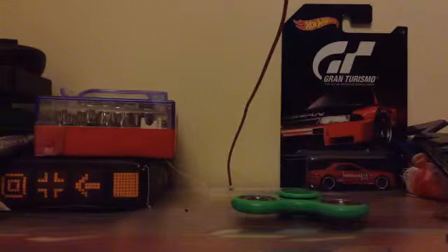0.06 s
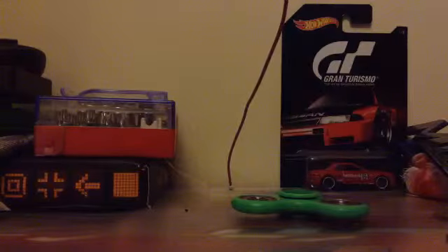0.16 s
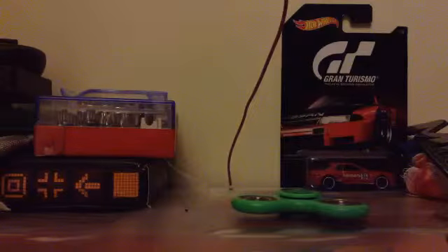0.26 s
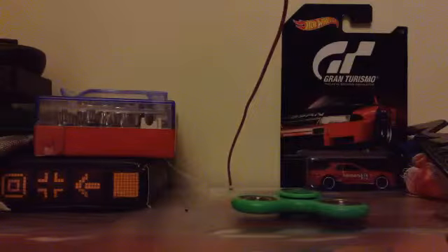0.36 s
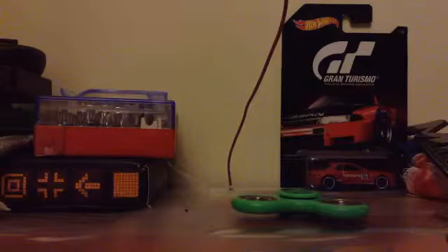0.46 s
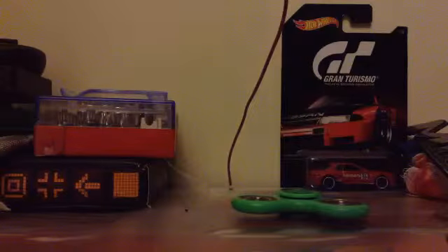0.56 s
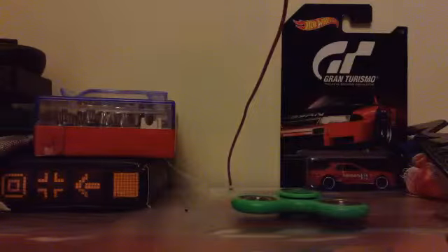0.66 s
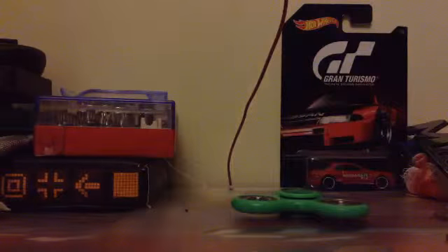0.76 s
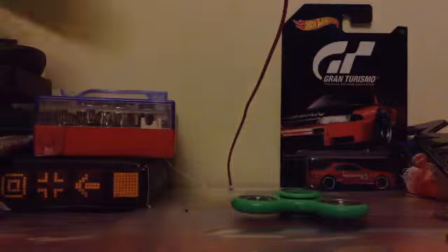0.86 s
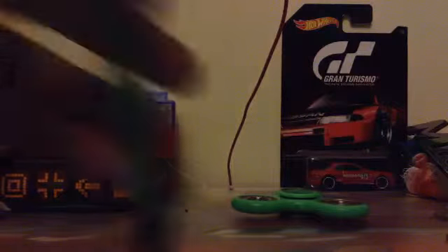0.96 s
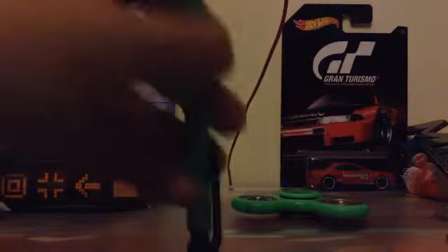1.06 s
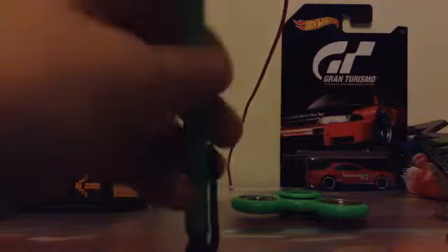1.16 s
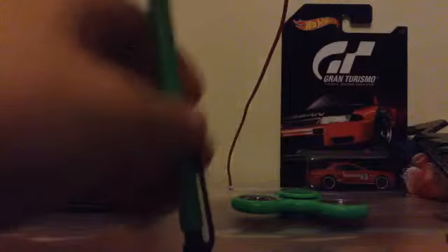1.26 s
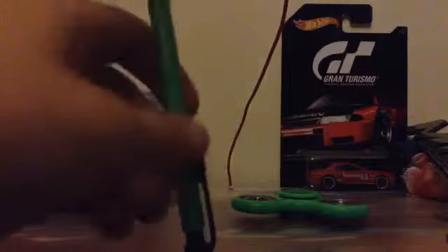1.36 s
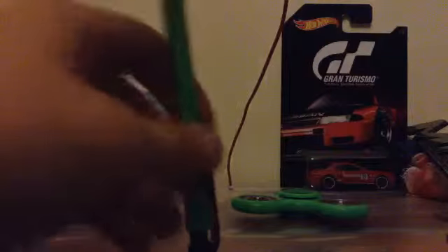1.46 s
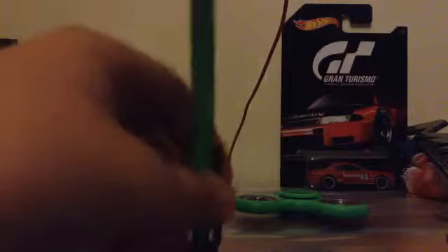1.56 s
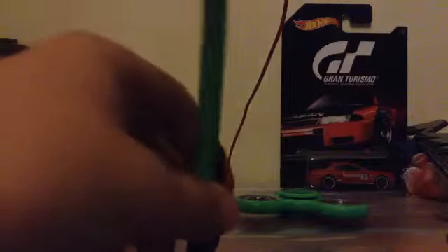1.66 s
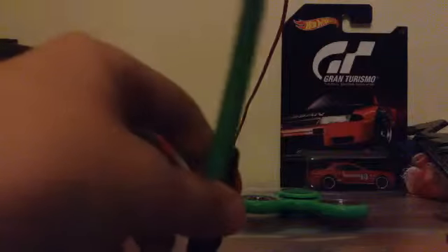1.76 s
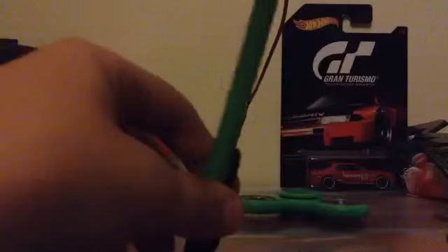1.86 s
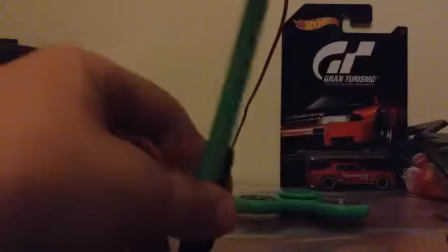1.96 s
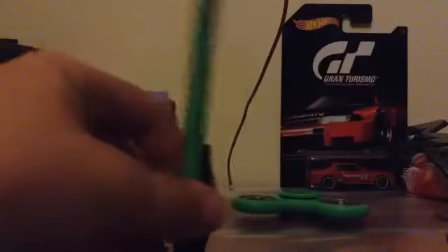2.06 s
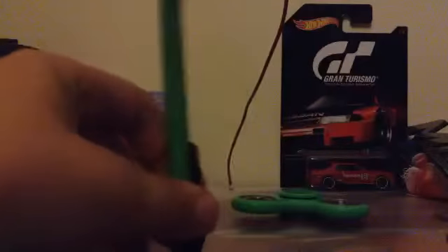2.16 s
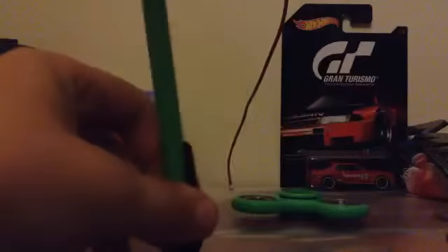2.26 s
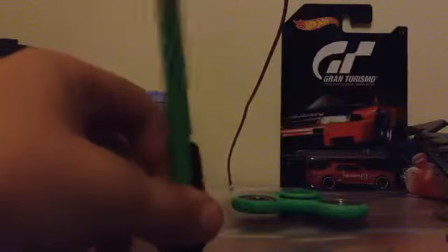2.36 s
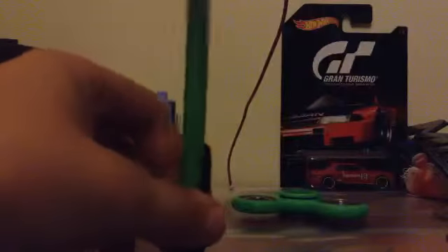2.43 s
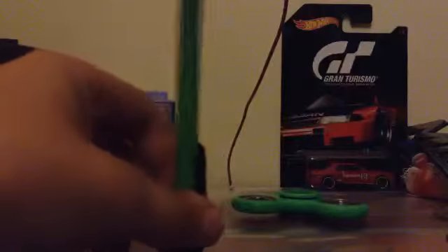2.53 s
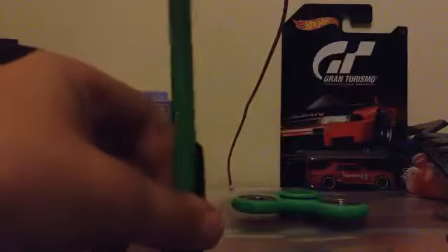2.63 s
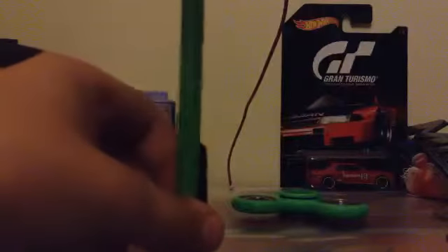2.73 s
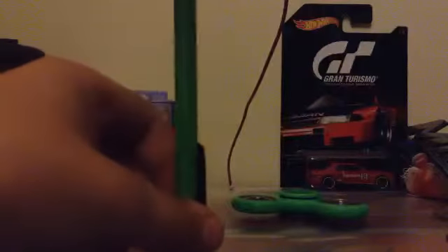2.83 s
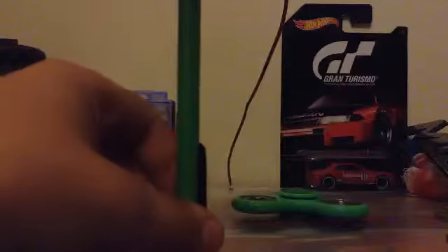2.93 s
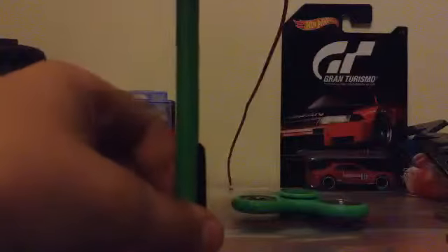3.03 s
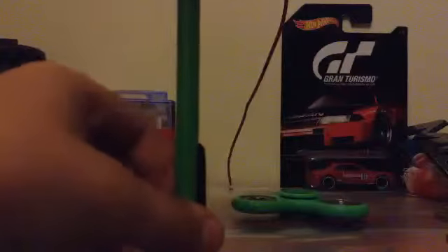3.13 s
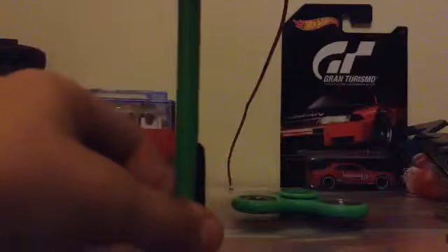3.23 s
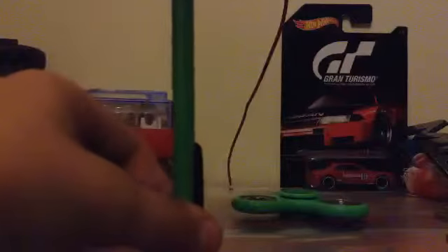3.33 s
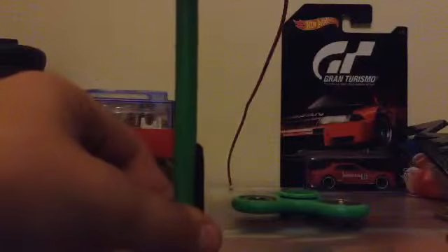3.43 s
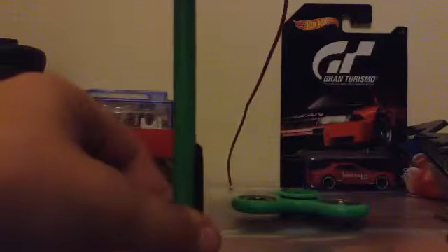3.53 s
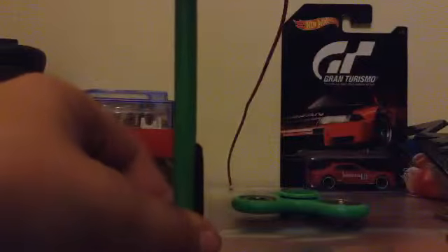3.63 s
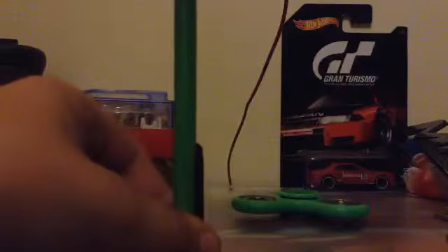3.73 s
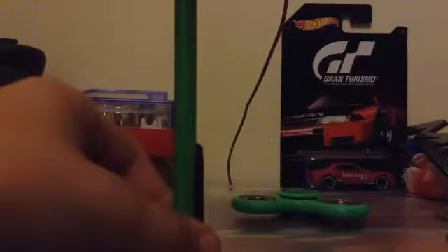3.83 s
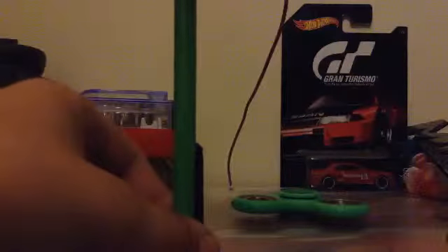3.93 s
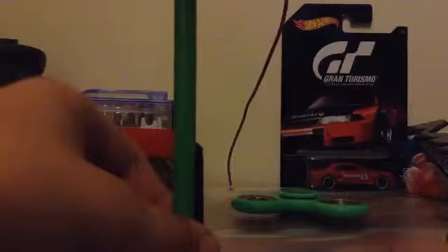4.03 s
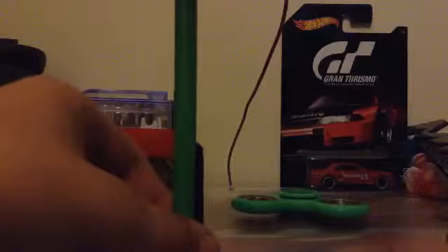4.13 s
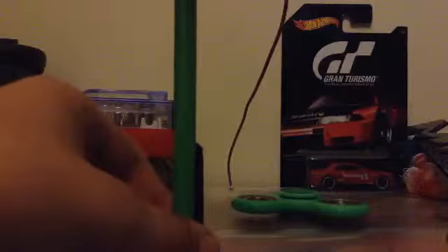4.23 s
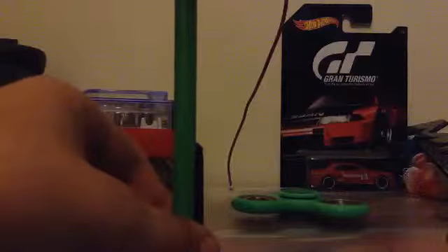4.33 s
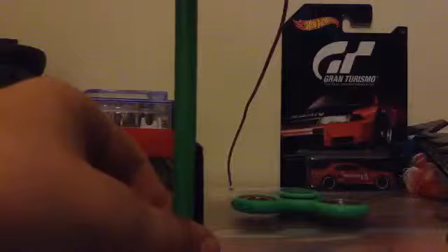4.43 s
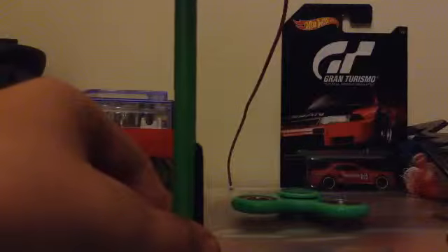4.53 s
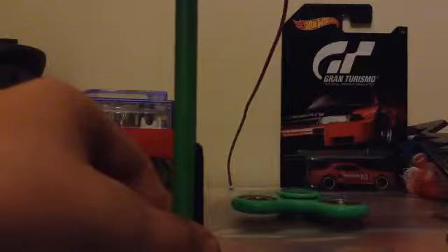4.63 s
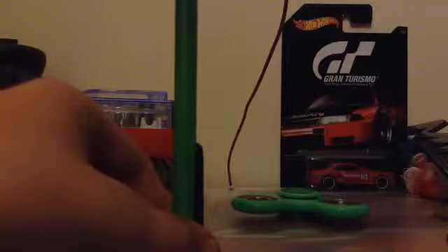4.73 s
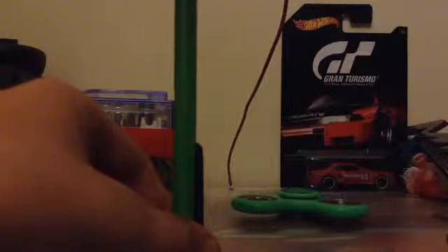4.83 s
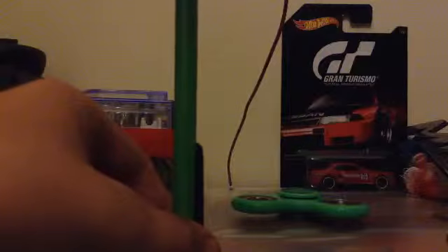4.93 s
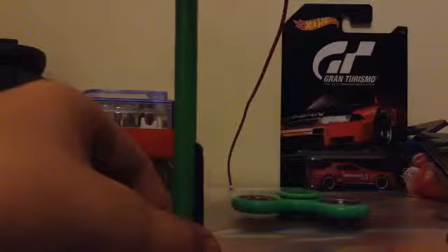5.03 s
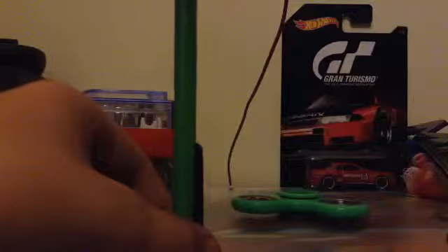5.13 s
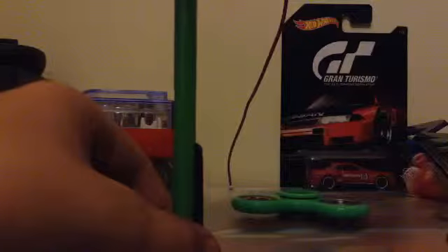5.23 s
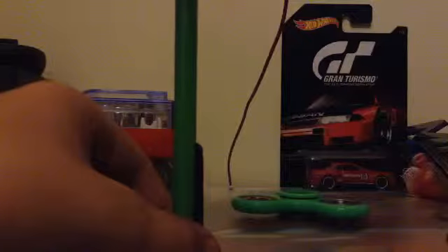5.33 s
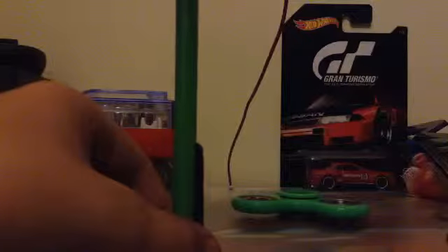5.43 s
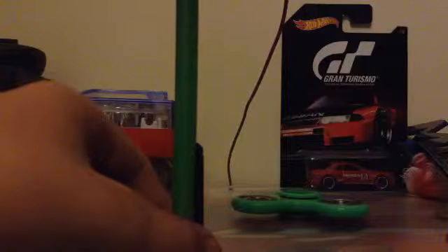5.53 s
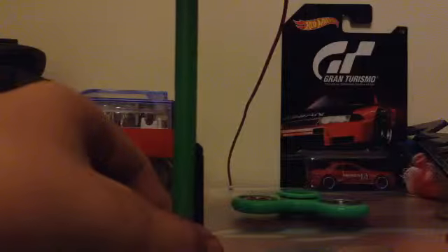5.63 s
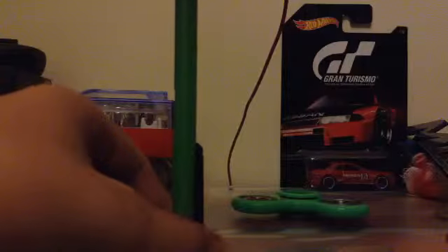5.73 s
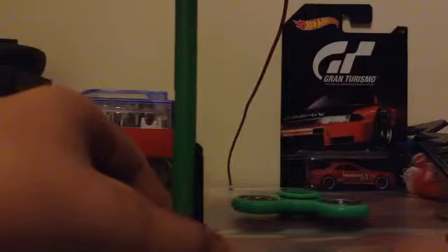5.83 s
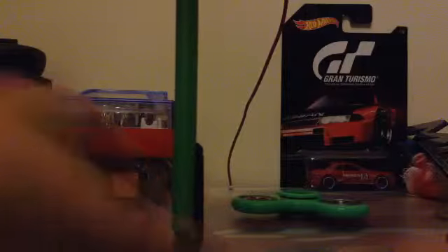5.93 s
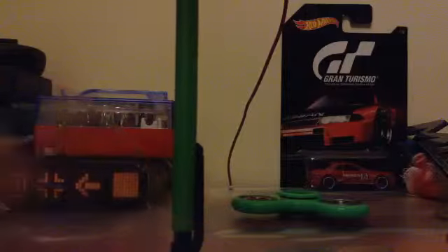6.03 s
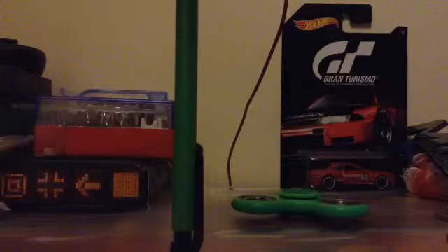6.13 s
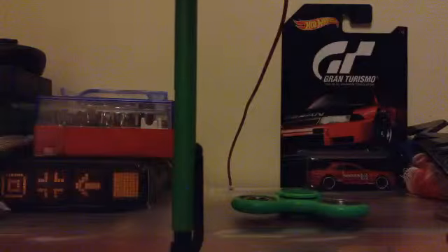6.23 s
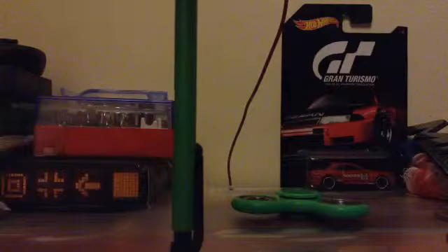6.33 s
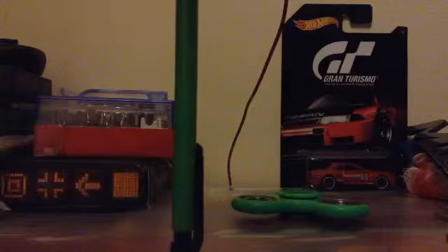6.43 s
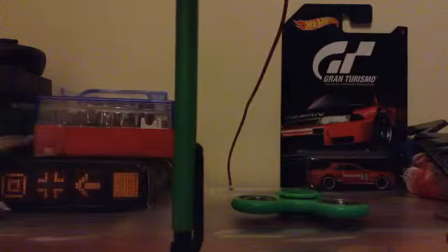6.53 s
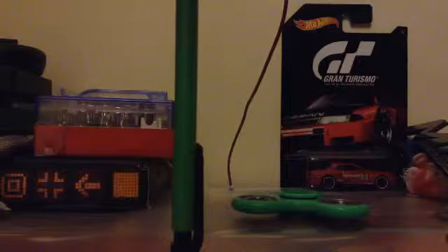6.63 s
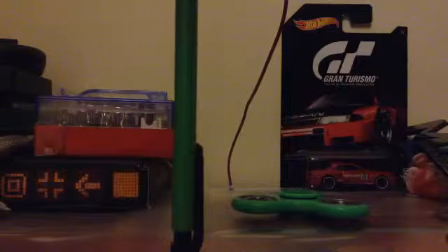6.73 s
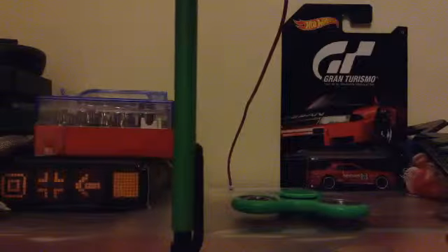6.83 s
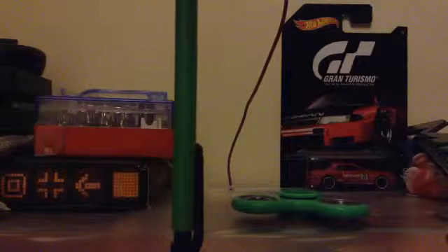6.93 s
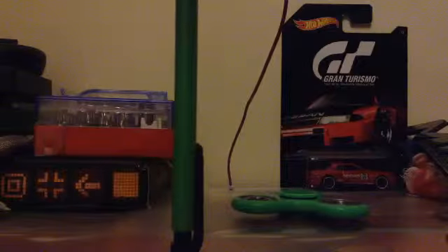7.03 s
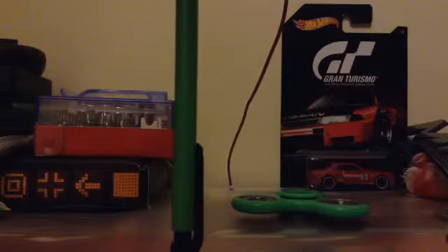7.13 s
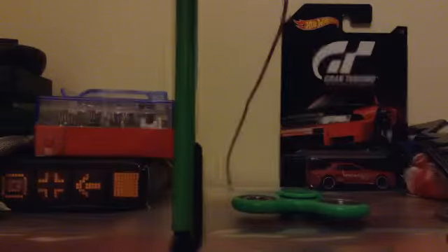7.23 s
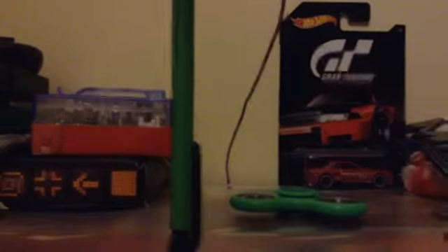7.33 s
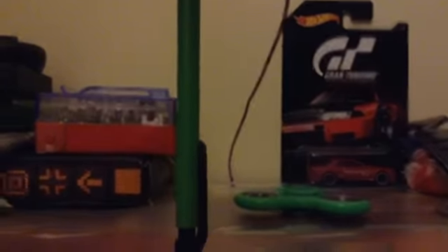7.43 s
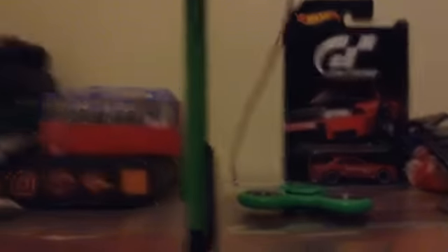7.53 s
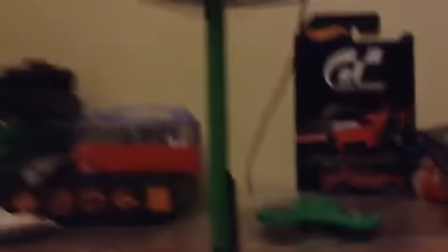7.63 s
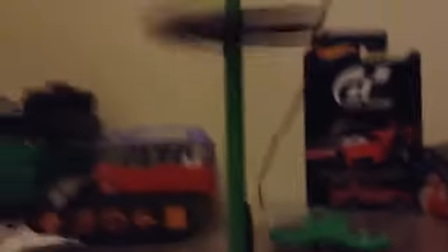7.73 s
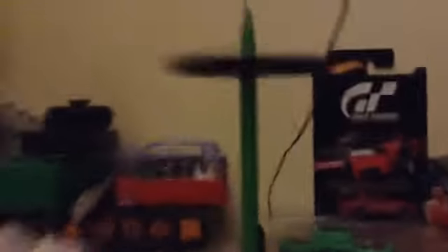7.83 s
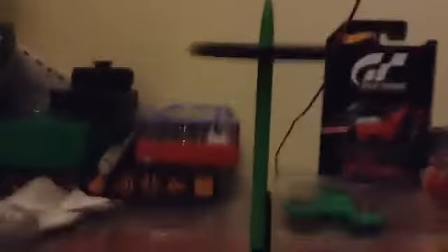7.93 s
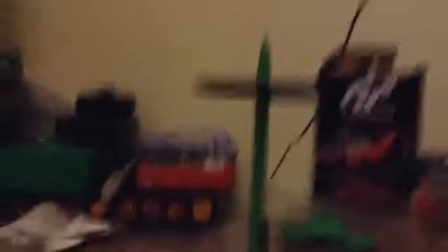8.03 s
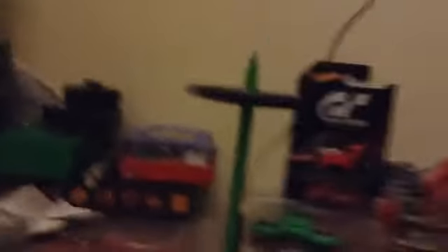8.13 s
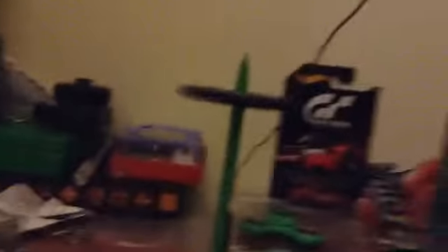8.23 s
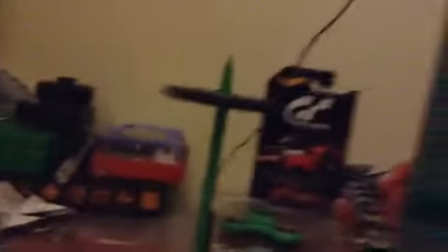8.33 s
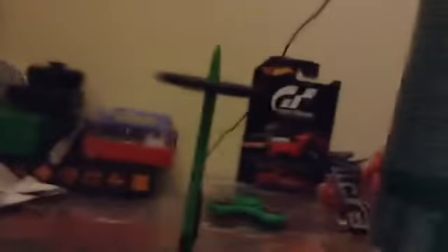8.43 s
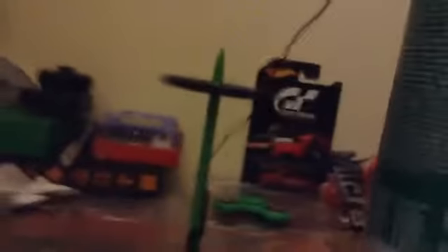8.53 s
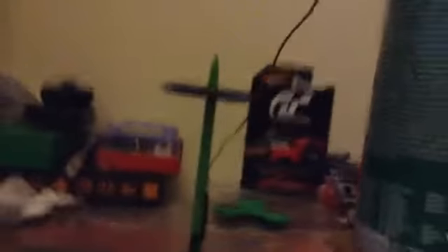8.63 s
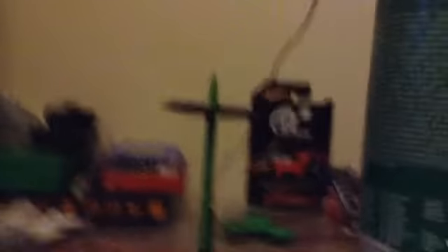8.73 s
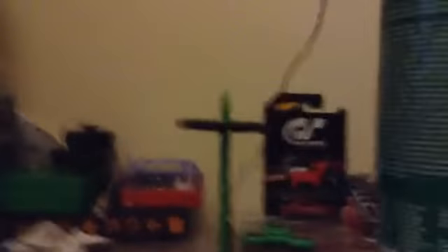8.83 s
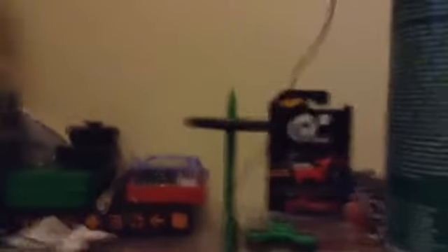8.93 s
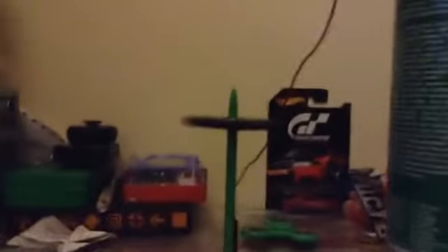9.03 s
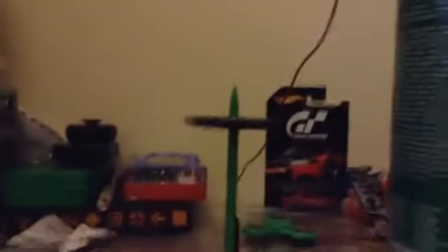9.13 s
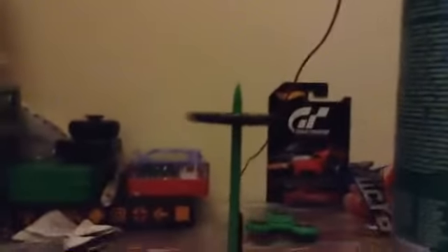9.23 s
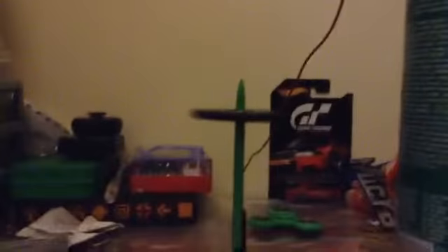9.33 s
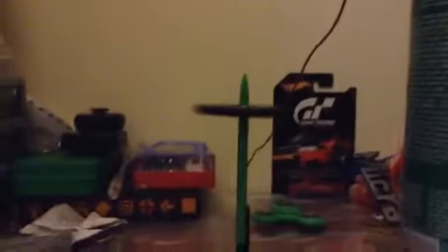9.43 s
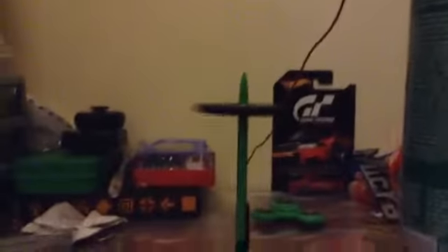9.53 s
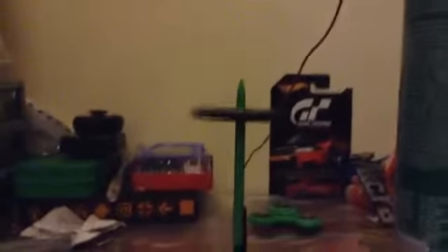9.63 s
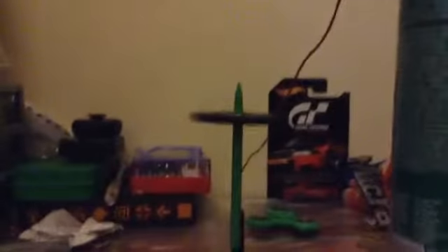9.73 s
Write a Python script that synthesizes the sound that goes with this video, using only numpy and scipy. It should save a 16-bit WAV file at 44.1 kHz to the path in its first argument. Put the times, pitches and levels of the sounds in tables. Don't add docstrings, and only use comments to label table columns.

```python
import sys
import numpy as np
from scipy import signal
from scipy.fft import rfft, irfft
from scipy.io import wavfile
from scipy.ndimage import uniform_filter1d

SR = 44100
rng = np.random.default_rng(int(sys.argv[2]) if len(sys.argv) > 2 else 0)


def materialize(psi):
    bounded = np.clip(np.atleast_2d(psi).T, -1, 1)
    quanta = np.round(bounded * 32767).astype(np.int16)
    wavfile.write(sys.argv[1], SR, quanta)


def voltage_ratio(level):
    return 10 ** (np.asarray(level, float) / 20)


N = 431298
TIME, HZ = np.arange(N) / SR, np.fft.rfftfreq(N, 1 / SR)

TURN_S, TURNS = 6.5, (-.03, 31.9056, -.513596, .0076509)
GLIDE_WIDTH_HZ = 460
TREMBLE_DB, TREMBLE_HZ = 1, 23.66
SNAP_S = 5.8845

# frequency in Hz, density in dB per Hz.
ROOM_TONE_DB = [(18, -61), (30, -31), (54, -31), (90, 13), (118, 2), (447, -1), (700, -4), (910, -36),
                (1540, -120)]
# time in seconds, pitch in Hz, level in dB.
GLIDE_HZ_DB = [(.2, 3600, -79), (.32, 3302, -55), (.44, 3000, -70), (.52, 6200, -62), (.64, 6100, -49),
               (.72, 5200, -55), (.8, 4500, -47), (.9, 6200, -54), (1.0, 6900, -43), (1.12, 6900, -62),
               (1.45, 3290, -49), (1.6, 3280, -47), (1.8, 3490, -51.5), (2.08, 3600, -70),
               (2.2, 3500, -51), (2.34, 3300, -50.5), (2.46, 3300, -73), (7.72, 3730, -78),
               (7.85, 3650, -62), (8.1, 3626, -55.5), (8.5, 3510, -62.5), (8.9, 3430, -71),
               (9.3, 3450, -78)]
# start in seconds, peak in dB.
TICKS_DB = [(0.867, -31.5), (0.916, -38), (0.924, -35), (1.1287, -27), (5.870, -34), (5.942, -37),
            (6.098, -36), (6.130, -34)]
# time in seconds, level in dB.
RUB_DB = [(5.93, -67), (6.0, -59), (6.04, -50), (6.07, -45.5), (6.1, -51), (6.135, -46), (6.142, -66)]
# start in seconds, peak in dB, push in ms, ring t60 in seconds,
# brightness in dB per octave.
THUDS = [(0.093, -51.5, 1.4, 0.39, -45), (0.864, -50, 0.18, .04, 17), (1.044, -31, 0.85, 0.18, 7),
         (1.054, -29, 0.73, 0.4, 4.5), (1.1297, -17.5, 0.83, 0.11, 4.5), (1.143, -22.5, 1.4, 0.11, -4),
         (1.224, -42, 1.4, .06, -7), (1.338, -28, 1, 0.04, 24), (1.365, -34, 1.1, 0.051, 14),
         (1.441, -34, 1.1, .07, -6), (1.609, -48, 1.4, 0.052, 2), (1.629, -32.5, 3.4, 0.053, -11),
         (2.883, -47, 1.9, 0.12, -10), (5.884, -34, 0.51, 0.064, 8)]
# frequency in Hz, level in dB, share of the thud's t60.
WOOD_MODES = [(215, -4, 0.47), (260, -2.5, 0.63), (375, -6, 0.32), (454, -12, 0.36), (553, -22, 0.23),
              (910, -16, 0.15), (1260, -21.5, 0.18), (1600, -20, 0.2)]
# time in seconds, weight in dB.
PRESS_DB = [(0, 2.5), (.55, -4), (.82, -10.5), (.88, 7), (1.0, -4), (1.2, 1.5), (1.46, 0), (2.01, -1),
            (2.43, -4.5), (2.52, 4.5), (3.31, -0.5), (3.66, 6), (4.15, 6.5), (4.5, 1), (5.3, 0.5),
            (5.85, -3.5), (5.94, 3.5), (6.13, 5.5), (6.22, -3.5)]
# middle in seconds, length in seconds, weight change in dB.
LIFTS = [(2.255, .035, -16), (2.345, .03, -11), (2.85, .06, -23), (2.985, .12, -17), (3.455, .2, -22)]
PRESS_SHARE = (1., .24, .08, 0)
# start in seconds, peak above 3 kHz in dB, level near 1 kHz against it in dB.
RATTLES = [(1.1418, -19.5, -14), (1.2053, -37, -20), (1.289, -23, -19), (1.343, -19, -22), (1.401, -24, -2),
           (6.3081, -37, -3), (6.421, -34, -23), (6.4893, -26.5, -7), (6.902, -27, -13), (7.5548, -34, -10),
           (1.7809, -30, -17), (5.2071, -43, -15), (6.4503, -39, -15), (6.7785, -36, -17),
           (7.0848, -36, -17), (7.2884, -37, -12), (7.5054, -34, -18), (7.833, -34, -19), (7.976, -36, -15),
           (8.706, -40, -3), (8.9421, -41, -8), (9.008, -39, -12), (9.145, -43, -13)]
# time in seconds, lead in turns.
SLIP_TURNS = [(2.2, .42), (2.4, 0)]
# time in seconds, peak in dB.
HARD_KNOCKS_DB = [(7.577, -27), (7.644, -39), (7.677, -41), (7.718, -33), (7.808, -41), (7.833, -41),
                  (7.909, -31), (7.942, -39), (7.977, -36), (8.007, -34), (8.041, -37), (8.074, -32),
                  (8.109, -36), (8.141, -39), (8.173, -35), (8.207, -40), (8.24, -39), (8.264, -40),
                  (8.306, -34), (8.335, -43), (8.372, -34), (8.406, -40), (8.439, -30), (8.472, -40),
                  (8.505, -33), (8.526, -36), (8.571, -35), (8.641, -39), (8.672, -40), (8.707, -40),
                  (8.738, -48), (8.773, -40), (8.797, -44), (8.829, -42), (8.872, -35), (8.943, -35),
                  (8.97, -34), (9.009, -39), (9.042, -39), (9.078, -37), (9.112, -39), (9.146, -34),
                  (9.18, -43), (9.214, -35), (9.237, -39), (9.283, -39), (9.347, -37), (9.386, -39),
                  (9.416, -34), (9.453, -40), (9.486, -38), (9.526, -33), (9.551, -38), (9.593, -43),
                  (9.617, -41), (9.656, -44), (9.737, -40)]
# time in seconds, race level in dB.
NEARNESS_DB = [(0, -52), (.42, -52.5), (.85, -40.5), (1.03, -40), (1.3, -39), (1.45, -38.5), (1.6, -41.5),
               (1.93, -42.5), (2.25, -42.5), (3.15, -43), (3.75, -44.5), (5.8, -44.5), (6.0, -43.5),
               (6.25, -45), (7.57, -45), (7.72, -48.5), (8.09, -51.5), (8.88, -54.5), (9.78, -54.5)]
# time in seconds, pose number (0 carried, 1 brought near, 2 set down,
# 3 tilted, 4 steadied, 5 gripped, 6 left standing, 7 heard from afar).
POSE = [(0, 0), (.42, 0), (.82, 1), (1.12, 1), (1.24, 2), (1.48, 2), (1.7, 3), (2.1, 3), (2.2, 3.6),
        (2.42, 3.6), (2.5, 4), (3.3, 4), (3.65, 5), (4.3, 5), (4.65, 5.5), (5.85, 5.5), (6.2, 6), (7.58, 6),
        (7.66, 6.5), (7.95, 7)]
# frequency in Hz, width in Hz.
MODES_HZ = [(100, 45), (133, 22), (213, 50), (275, 60), (385, 60), (500, 150), (800, 210), (990, 125),
            (1090, 120), (1300, 280), (1580, 150), (1720, 140), (1900, 230), (2350, 460), (2770, 310),
            (3280, 520), (3670, 260), (4250, 550), (4900, 650), (5450, 550), (6100, 550), (6750, 600),
            (7350, 650), (8300, 1100), (9350, 1000), (10400, 1000), (11700, 1500), (12900, 1100),
            (13800, 800), (14500, 700), (15150, 500)]
PART_EDGES_HZ = (600, 2200, 5700)
# desk, pencil, arms, race, all in dB.
KNOCK_DB = [
    (-15, -15, -10, -6),
    (-11, -14.5, -2, -9.5),
    (-12, -13.5, -6, -14),
    (-14.5, -11, -6, -5),
    (-14.5, -14.5, -11, -9),
    (-15.5, -16, -7, -12),
    (-14.5, -12, -11, -8),
    (-14.5, -5, -0.5, 3.5),
]
DESK_DB = [(-100, -93, -83, -83.5, -82, -78.5), (-96, -81, -73, -81, -80, -77.5),
           (-85, -58.5, -59.5, -55, -54, -54), (-79, -62.5, -58, -57, -63, -62),
           (-80, -69, -58, -56.5, -65, -64), (-84, -70, -59.5, -64.5, -72, -72),
           (-74, -67.5, -66.5, -67.5, -74, -69.5), (-84, -76, -78, -79.5, -80, -78.5)]
PENCIL_DB = [(-73.5, -71.5, -87, -70, -71, -84, -71), (-65, -65.5, -79, -64, -60, -63, -61),
             (-45, -60, -62, -56, -56, -56, -53), (-48.5, -54.5, -62.5, -58, -55.5, -63, -57.5),
             (-48, -48, -53.5, -57.5, -52.5, -50, -53.5), (-48, -48.5, -51.5, -62, -51.5, -52.5, -53.5),
             (-57.5, -56, -75, -61.5, -58.5, -62.5, -53), (-71, -66.5, -83, -72, -63.5, -72, -60.5)]
ARMS_DB = [(-57.5, -59, -58, -66, -63, -66, -57.5), (-59, -55.5, -57.5, -62, -50.5, -47.5, -49.5),
           (-54.5, -56, -55.5, -57, -58, -46, -47), (-58, -60.5, -58, -65, -62, -54, -52.5),
           (-57.5, -60, -54, -56.5, -59, -55, -54.5), (-57, -53.5, -55.5, -58, -61.5, -53.5, -55),
           (-58, -68, -61.5, -57, -64.5, -57, -58), (-61.5, -64.5, -63, -61, -65, -67, -68.5)]
RACE_DB = [(-57.5, -55, -62, -62.5, -56.5, -59.5, -65, -73, -69, -68, -78.5),
           (-48, -49, -48.5, -51.5, -47.5, -48.5, -48, -54, -49.5, -53, -61),
           (-47.5, -45.5, -42.5, -48, -48, -47.5, -50, -49, -47, -49, -56),
           (-54.5, -49.5, -49, -53, -49.5, -49, -53, -54.5, -52, -53, -59),
           (-57, -50, -49, -51, -50.5, -49.5, -52.5, -53, -52.5, -52, -63),
           (-72, -49.5, -47.5, -51, -53.5, -47, -50, -55.5, -52.5, -46.5, -58),
           (-55.5, -46.5, -52, -56, -56, -56, -58.5, -59, -53.5, -50.5, -62),
           (-72.5, -64, -64.5, -69, -59, -57.5, -65, -72.5, -63.5, -66, -82)]
# time in seconds, depth from 0 to 1.
NOTCH_DEPTH = [(3.3, 0.3), (3.45, 0.8), (4.4, 0.8), (4.5, 0.9), (4.85, 0.6), (5.7, 0.7), (5.8, .9),
               (5.9, 0), (6.3, 0.7), (7.45, 0.7), (7.72, 0.8), (7.8, .15), (8.3, 0.5), (9.0, 0.7),
               (9.4, 0.95), (9.78, 0.7)]
# frequency in Hz, limit against the mean treble line in dB.
LINE_LIMIT_DB = [(3000, -32), (8000, -16), (10700, -11.5), (11300, -21), (12500, -13), (14300, -13),
                 (15000, -16), (15350, -10)]


def unit(x):
    return x / np.sqrt(np.mean(x ** 2))


def curve(table, column):
    return np.interp(TIME, np.array(table)[:, 0], np.array(table)[:, column])


def band(x, low_hz, high_hz, order=2):
    return signal.sosfilt(signal.butter(order, [low_hz, high_hz], "band", fs=SR, output="sos"), x)


def walk(rate_hz, size=1):
    gap = int(SR / rate_hz)
    knots = rng.standard_normal(N // gap + 1)
    at = gap * (np.arange(len(knots)) + .5)
    return unit(np.interp(np.arange(0, N, size), at, knots))


def swell(blows, rise_s):
    s = TIME[:SR // 40] / rise_s
    return signal.fftconvolve(blows, np.exp(-(s - 1.4) ** 2))[:N]


def room_tone():
    f, db = np.transpose(ROOM_TONE_DB)
    shape = voltage_ratio(np.interp(np.log(HZ + 1), np.log(f), db)) * (HZ < 700)
    return voltage_ratio(-99) * unit(irfft(rfft(rng.standard_normal(N)) * shape, N))


def glide():
    hiss = unit(band(rng.standard_normal(N), 22, GLIDE_WIDTH_HZ) * voltage_ratio(2 * walk(60)))
    carrier = np.sin(2 * np.pi * np.cumsum(curve(GLIDE_HZ_DB, column=1)) / SR)
    return voltage_ratio(curve(GLIDE_HZ_DB, column=2)) * np.sqrt(2) * hiss * carrier


def ticks():
    out, s = np.zeros(N), TIME[:SR // 50]
    for (at_s, db), noise in zip(TICKS_DB, rng.standard_normal((len(TICKS_DB), len(s)))):
        tick = band(noise * np.exp(-s / 0.0014), 770, 2540)
        start = int(at_s * SR)
        out[start:start + len(s)] += voltage_ratio(db) * tick / np.max(np.abs(tick))
    return out


def rub():
    slips = rng.standard_normal(N) * voltage_ratio(2.8 * walk(200) + 3.2 * rng.exponential(size=N))
    scrape = unit(band(slips, 2320, 3520) + 0.5 * band(slips, 320, 2500))
    return voltage_ratio(curve(RUB_DB, column=1)) * scrape * (np.abs(TIME - 6.07) < .15)


def thuds():
    out, s = np.zeros(N + SR), TIME[:SR // 4]
    detune = 1 + 0.013 * rng.standard_normal((len(THUDS), len(WOOD_MODES)))
    for (at_s, db, push_ms, t60_s, tilt_db), shift in zip(THUDS, detune):
        ring = 0
        for (f, mode_db, share), d in zip(WOOD_MODES, shift):
            decay = 1000. ** (-s / (share * t60_s))
            ring = ring + voltage_ratio(mode_db + tilt_db * np.log2(f / 300)) * np.sin(2 * np.pi * f * d * s) * decay
        push = np.hanning(int(push_ms * SR / 1000) + 3)
        hit = band(signal.fftconvolve(ring, push)[:len(s)], 150, 4400)
        start = int(at_s * SR)
        out[start:start + len(s)] += voltage_ratio(db) * hit / np.max(np.abs(hit))
    return out[:N]


def snap():
    s = np.clip(TIME - SNAP_S, 0, 1)
    crack = voltage_ratio(-19) * rng.standard_normal(N) * np.exp(-np.abs(TIME - SNAP_S) / .0007)
    swing = voltage_ratio(-15.0) * np.sin(2 * np.pi * 600 * s) * np.exp(-s / 0.00075)
    return band(crack, 3200, 14000) - band(swing, 230, 1800, order=3)


def foot():
    lifts_db = sum(db * np.exp(-((TIME - at_s) / (length_s / 2)) ** 4) for at_s, length_s, db in LIFTS)
    return curve(PRESS_DB, column=1) + lifts_db + TREMBLE_DB * walk(TREMBLE_HZ)


def rattles(column):
    table, blows = np.array(RATTLES), np.zeros(N)
    blows[(table[:, 0] * SR).astype(int)] = voltage_ratio(np.sum(table[:, 1:column + 1], axis=1) - 11.0)
    return swell(blows, .0014)


def knocks():
    turns = np.polyval(TURNS[::-1], TIME - TURN_S) + curve(SLIP_TURNS, column=1)
    at = np.nonzero(np.diff(np.floor(turns)))[0]
    chance = rng.standard_normal((len(at), 3)).T
    lean = np.zeros(N)
    lean[at] = 110 * voltage_ratio(chance[1])
    at = np.clip(at + (0.001009 * SR * chance[0]).astype(int) - 90, 0, N - 1)
    beat = at.copy()
    size_db = -1.5 * (at > HARD_KNOCKS_DB[0][0] * SR)
    near_db = curve(NEARNESS_DB, column=1)
    for s, db in HARD_KNOCKS_DB:
        k = np.argmin(np.abs(at - s * SR))
        at[k] = (s - .0015) * SR
        size_db[k] = 0.64 * (db - 15.5 - near_db[at[k]])
        chance[1:, k] = 0
    push, scrape = np.zeros((2, N))
    push_at = np.where(np.abs(at - beat) > .006 * SR, beat, at)
    push[push_at] = voltage_ratio(size_db + 1.6 * chance[1])
    scrape[at] = voltage_ratio(size_db + 2.7 * chance[2])
    return lean, 110 * push, 0.85 * swell(scrape, 0.0019)


def spinner():
    (lean, push, scrape), wobble = knocks(), walk(9.7)
    blows = np.nonzero(push)[0]
    reach = np.clip(blows[:, None] + np.arange(-60, 140), 0, N - 1)
    pose = curve(POSE, column=1)[::100]

    def posed(row):
        return np.interp(pose, np.arange(len(row)), row)

    def fine(db):
        return np.interp(TIME, TIME[::100], voltage_ratio(db))

    modes = np.array(MODES_HZ)
    coupling_db = np.hstack([DESK_DB, PENCIL_DB, ARMS_DB, RACE_DB]).T
    parts = np.searchsorted(PART_EDGES_HZ, modes[:, 0])
    totals_db = [posed(10 * np.log10(np.sum(voltage_ratio(2 * coupling_db[parts == k]), axis=0))) for k in range(4)]
    near_db, weight_db = curve(NEARNESS_DB, column=1), foot()
    levels = [voltage_ratio(near_db + share * weight_db) * fine(total_db - totals_db[3])
              for share, total_db in zip(PRESS_SHARE, totals_db)]
    treble = rattles(column=1) / np.hypot(levels[2], levels[3])
    extra = [0, rattles(column=2) / levels[1], treble, treble]
    unsteadiness_db = [(0.49, 1.1, 2.06), (0.33, 1.7, 0.87), (0.1, 1.1, 1.5), (0.11, 0.9, 0.48)]
    out = 0
    for part, (wobble_db, rough_db, flicker_db) in enumerate(unsteadiness_db):
        strength = fine(posed(np.array(KNOCK_DB)[:, part]))
        shared = voltage_ratio(wobble_db * wobble + rough_db * walk(90)) * (1 + strength * scrape)
        shared = shared / np.sqrt(uniform_filter1d(shared ** 2, SR // 3)) + extra[part]
        grit = unit(voltage_ratio(1.85 * rng.exponential(size=N)))
        for (f, width_hz), mode_db in zip(modes[parts == part], coupling_db[parts == part]):
            roll = rng.standard_normal(N)
            drive = shared * np.roll(grit, int(f)) * roll
            if part == 0:
                drive = drive + 1.21 * strength * lean
            elif f < 4000:
                phase = 2 * np.pi * rng.random()
                cycles = np.hanning(200) * np.sin(2 * np.pi * f * TIME[:200] + phase) / 50
                share = (0.58 * (f < 900) + 0.94 * (900 < f < 1150)
                         + 0.56 * (1150 < f < 1800) + 0.17 * (f > 1800))
                blow = share * strength * push * (1 + 0.22 * roll)
                drive[reach] += blow[blows, None] * cycles
            ring = band(drive, f - width_hz / 2, f + width_hz / 2, order=2 + (part == 3))
            ring = ring * np.sqrt(SR / 2 / width_hz)
            level = uniform_filter1d(levels[part], size=3000) if f < 150 else levels[part]
            drift_db = flicker_db * walk(22, size=100) + 0.5 * walk(2.93, size=100)
            drift_db = drift_db + f / 8900.0 * walk(70, size=100)
            out = out + ring * level * fine(posed(mode_db) - totals_db[part] + drift_db)
    return out


def scene():
    near = spinner() + thuds() + glide() + ticks() + rub()
    s = TIME[:SR // 4]
    tail = rng.standard_normal(len(s)) * 1000. ** (-s / 0.11) * (s > .004)
    tail = tail / np.sqrt(np.sum(tail ** 2))
    near = near + voltage_ratio(-12.5) * signal.fftconvolve(near, tail)[:N]
    notch = signal.butter(2, [10950, 11900], "band", fs=SR, output="sos")
    dip = signal.sosfiltfilt(notch, near)
    near = near - np.clip(curve(NOTCH_DEPTH, column=1) + 0.087 * walk(12), 0, 1) * dip
    return (near + snap() + room_tone())[None]


def starve(x):
    hz, _, z = signal.stft(x, SR, "hann", 2048, 1024)
    mean = uniform_filter1d(np.mean(np.abs(z[140:700]) ** 2, axis=0), size=3) ** .5
    whim_db = uniform_filter1d(rng.standard_normal((65, z.shape[1])), size=3)
    whim_db = np.repeat(whim_db, 16, axis=0)[:len(hz)]
    limit_db = np.interp(hz, *np.transpose(LINE_LIMIT_DB))[:, None] + 8.9 * whim_db
    limit = mean * voltage_ratio(limit_db) * (hz > 2800)[:, None]
    kept = z * (np.abs(z) > limit) * (hz < 15340)[:, None]
    return signal.istft(kept, SR, "hann", 2048, 1024)[1][:N]


def low_pass(x):
    return signal.sosfilt(signal.butter(12, 15530, fs=SR, output="sos"), x)


def record(dry):
    dry = signal.sosfilt(signal.butter(3, 85, "high", fs=SR, output="sos"), dry)
    mix = starve(dry[0])[None]
    return low_pass(mix)


dry = scene()
out = record(dry)
materialize(out)
```